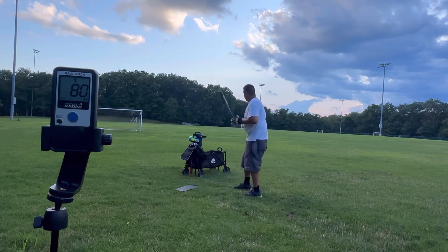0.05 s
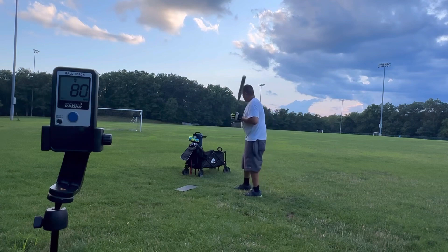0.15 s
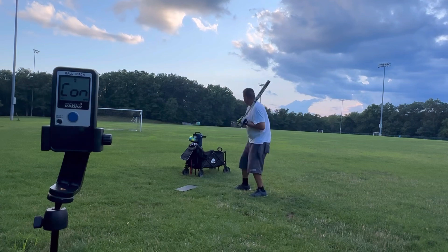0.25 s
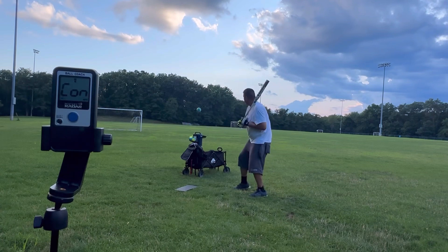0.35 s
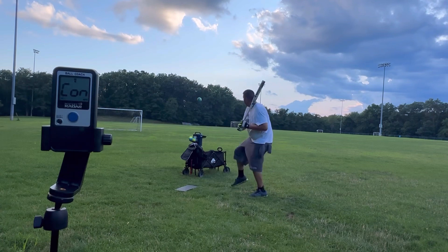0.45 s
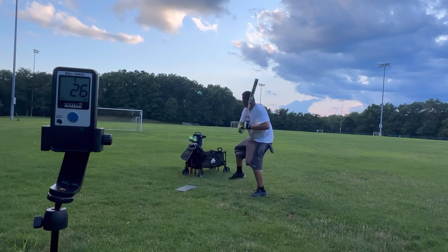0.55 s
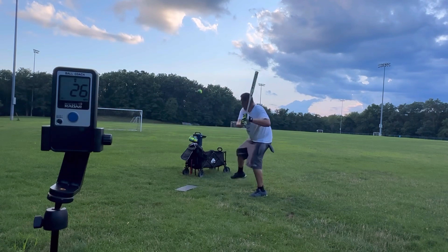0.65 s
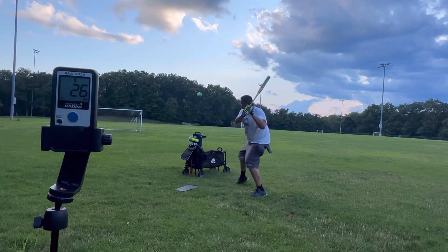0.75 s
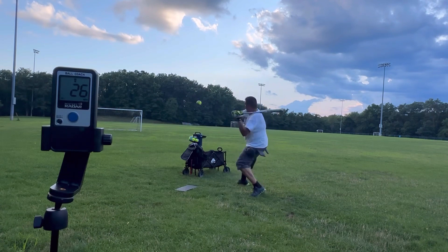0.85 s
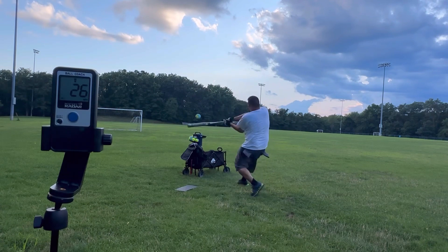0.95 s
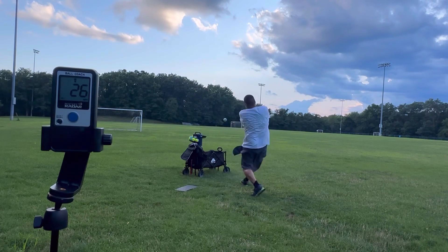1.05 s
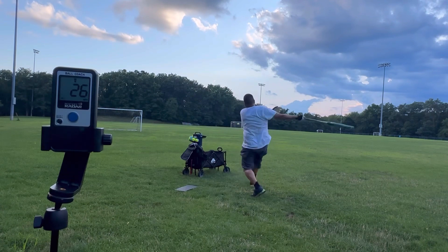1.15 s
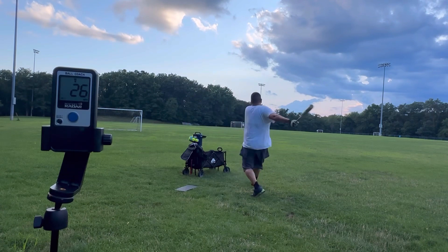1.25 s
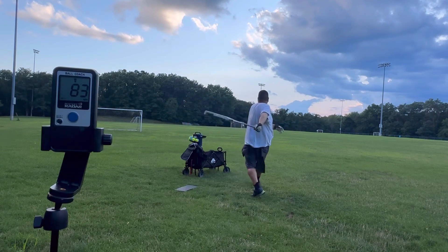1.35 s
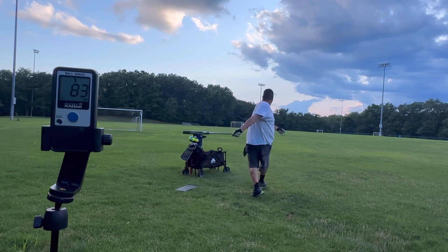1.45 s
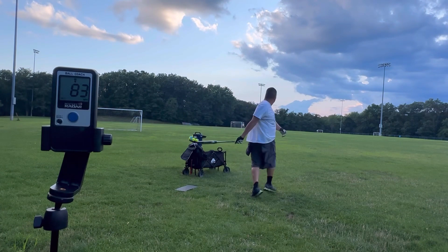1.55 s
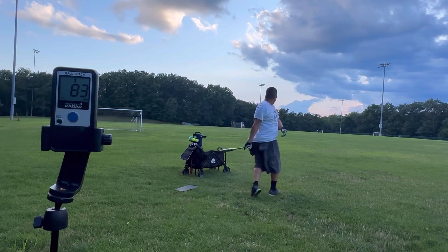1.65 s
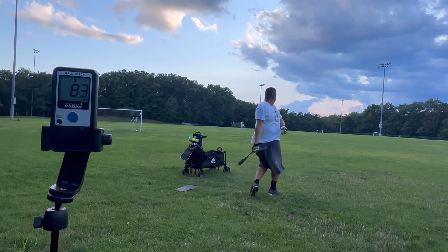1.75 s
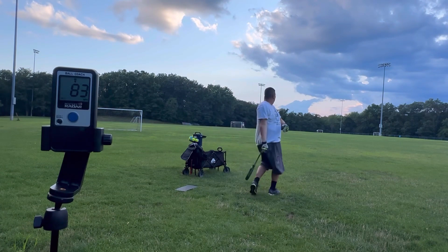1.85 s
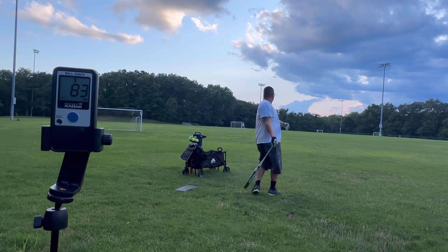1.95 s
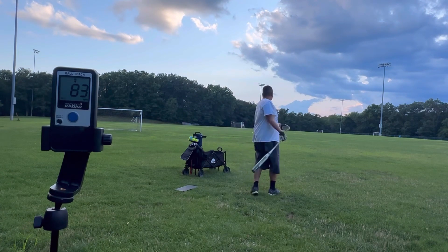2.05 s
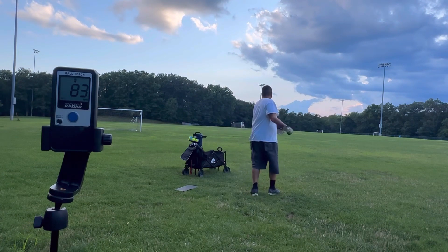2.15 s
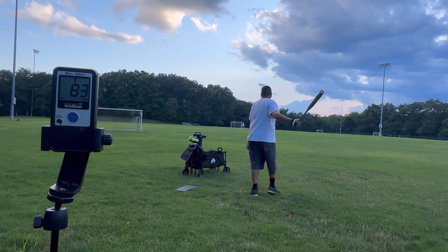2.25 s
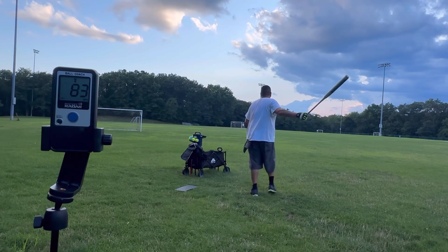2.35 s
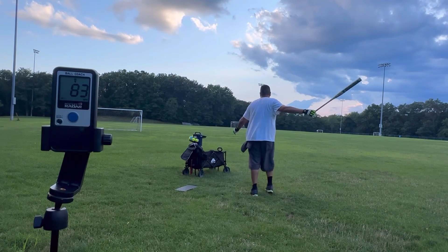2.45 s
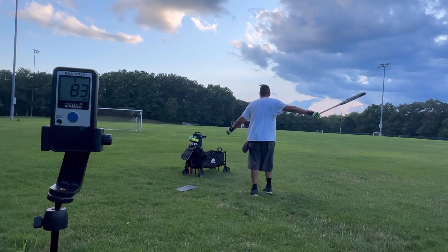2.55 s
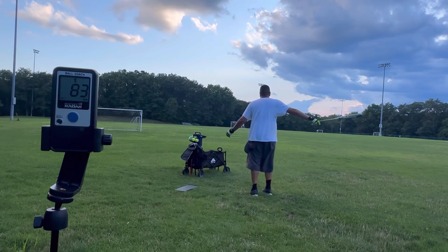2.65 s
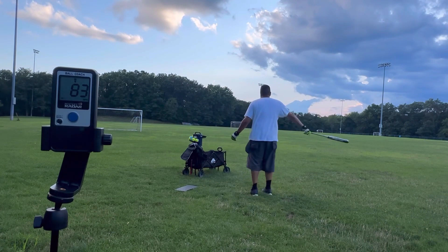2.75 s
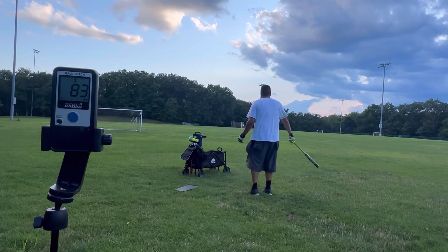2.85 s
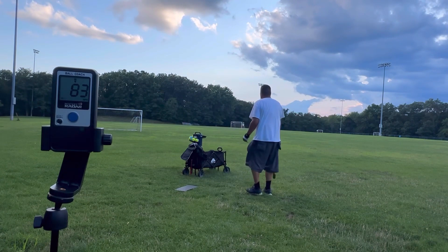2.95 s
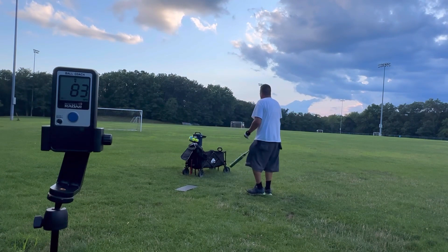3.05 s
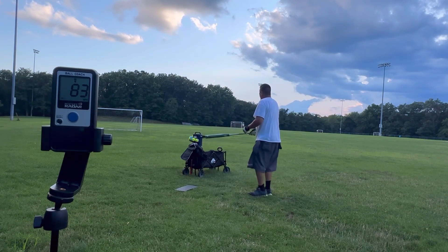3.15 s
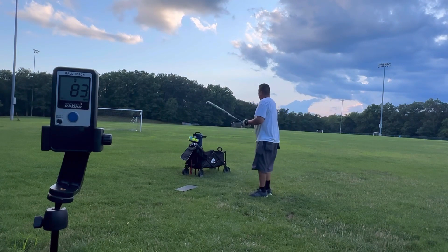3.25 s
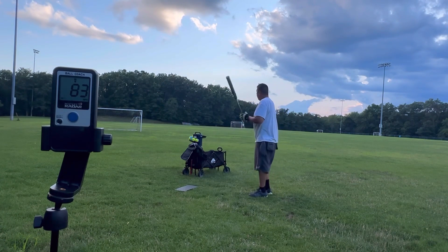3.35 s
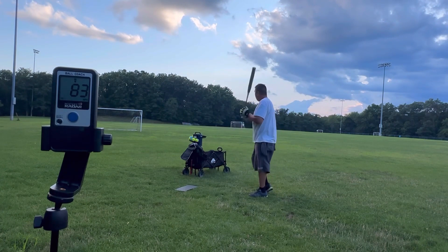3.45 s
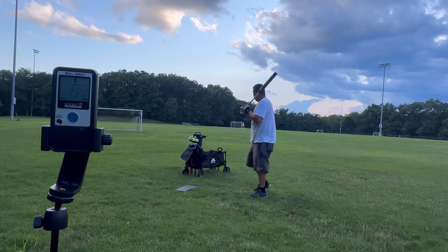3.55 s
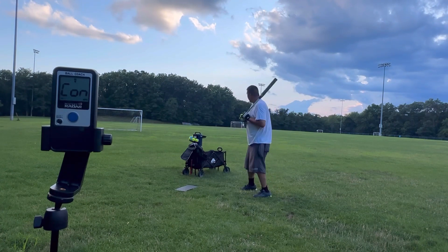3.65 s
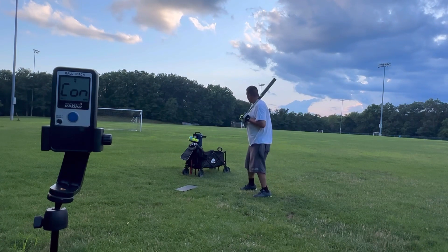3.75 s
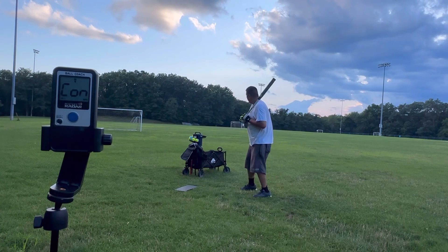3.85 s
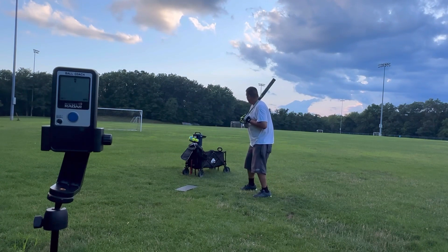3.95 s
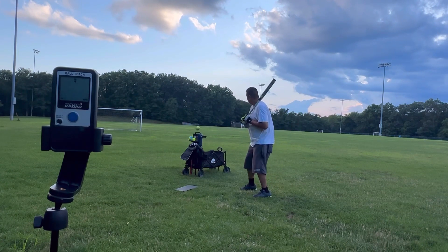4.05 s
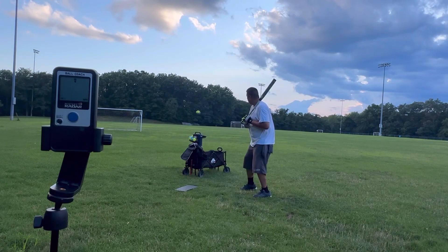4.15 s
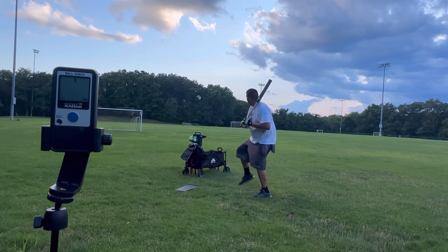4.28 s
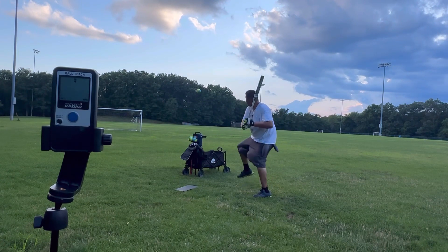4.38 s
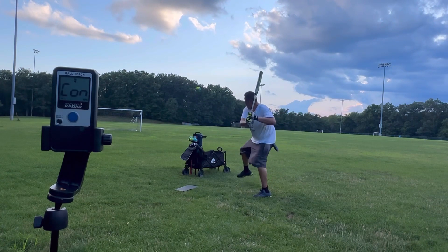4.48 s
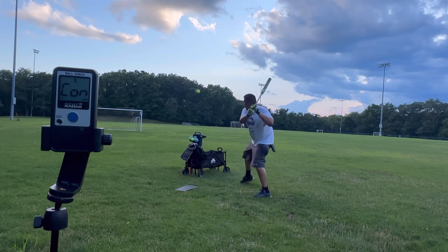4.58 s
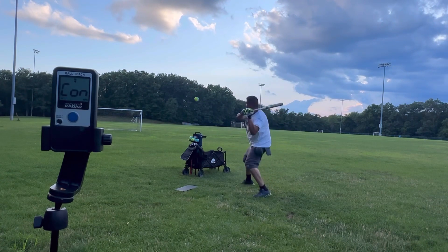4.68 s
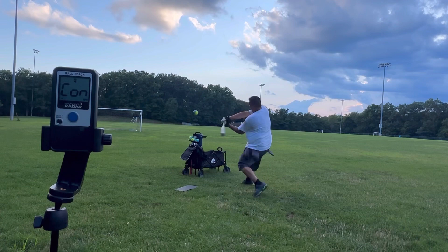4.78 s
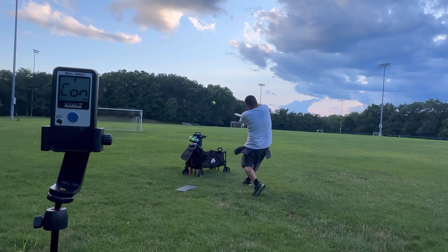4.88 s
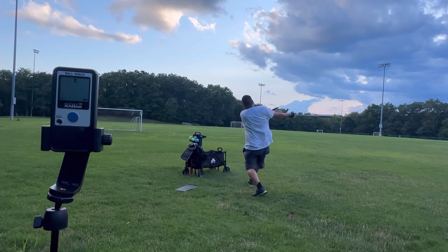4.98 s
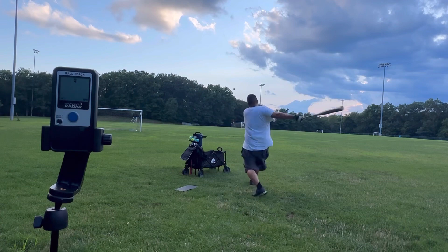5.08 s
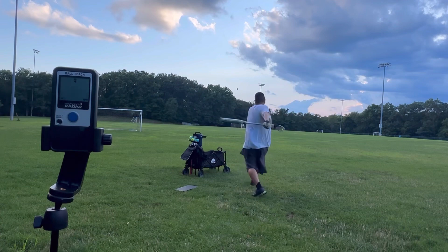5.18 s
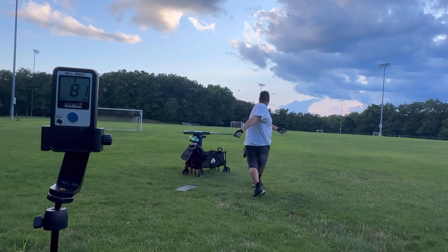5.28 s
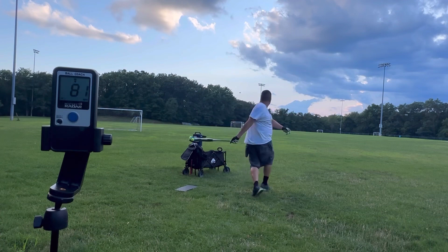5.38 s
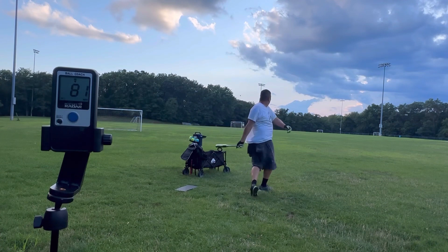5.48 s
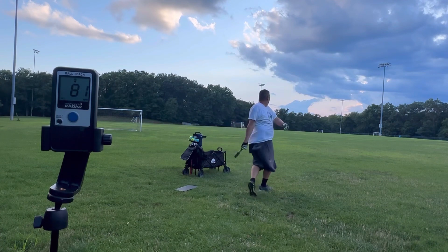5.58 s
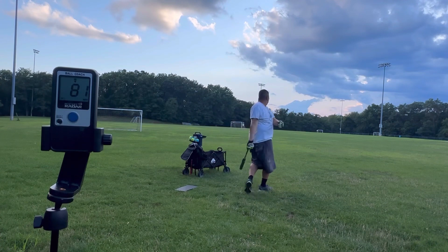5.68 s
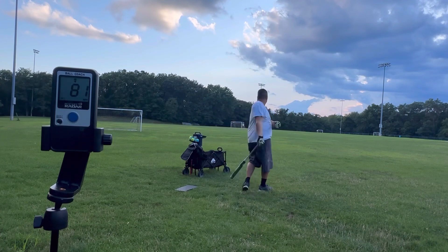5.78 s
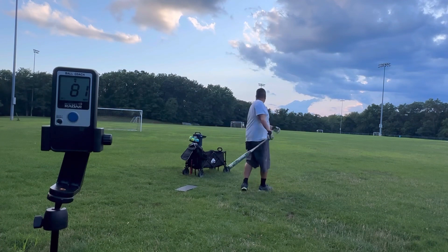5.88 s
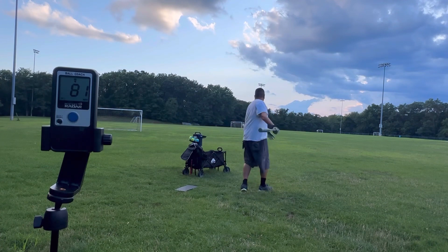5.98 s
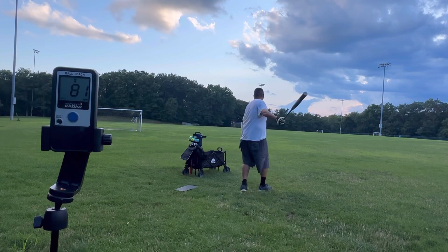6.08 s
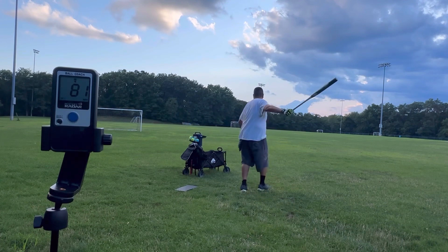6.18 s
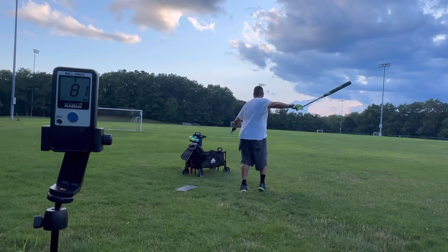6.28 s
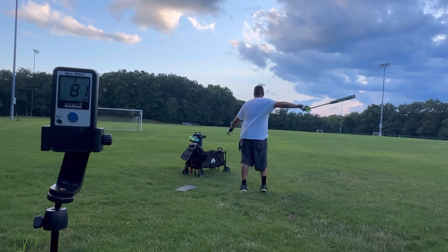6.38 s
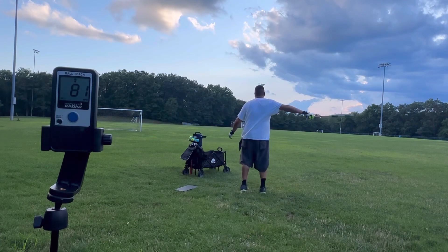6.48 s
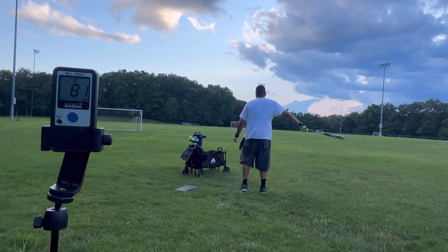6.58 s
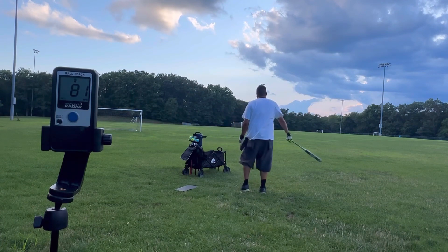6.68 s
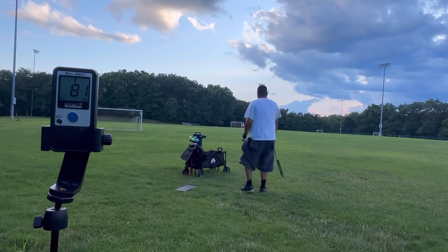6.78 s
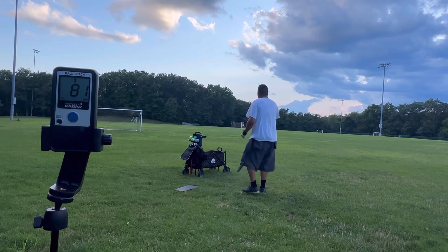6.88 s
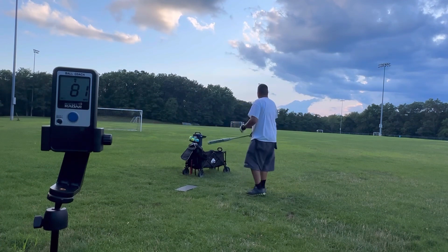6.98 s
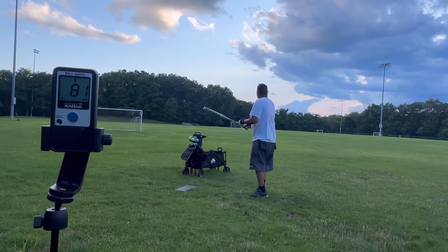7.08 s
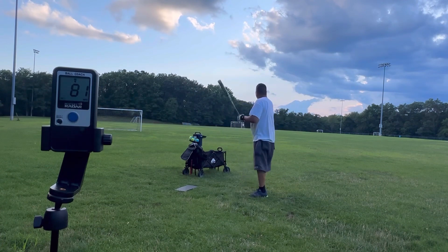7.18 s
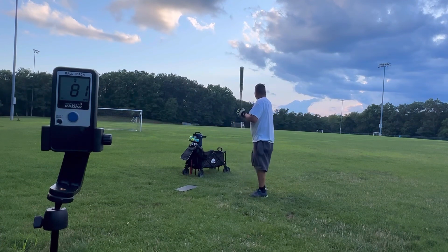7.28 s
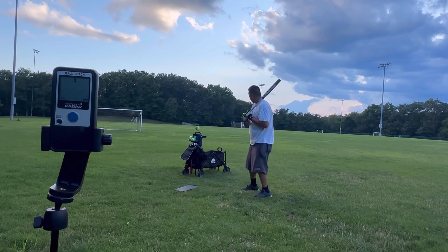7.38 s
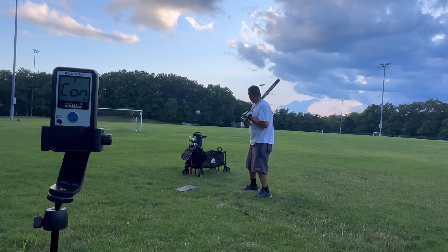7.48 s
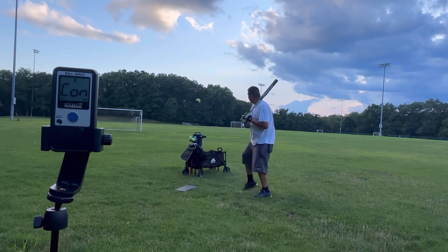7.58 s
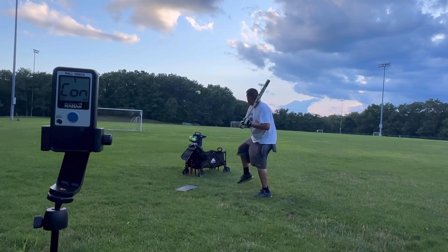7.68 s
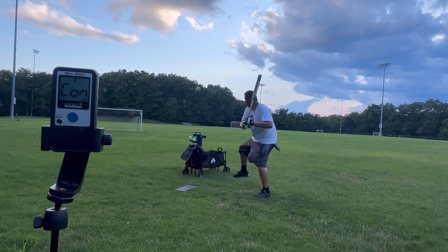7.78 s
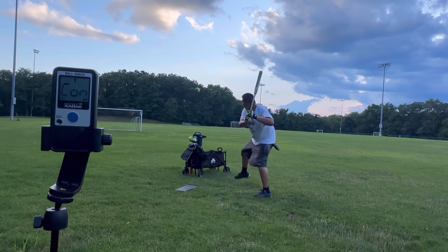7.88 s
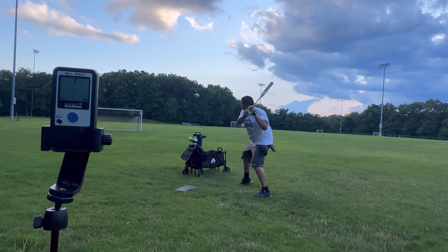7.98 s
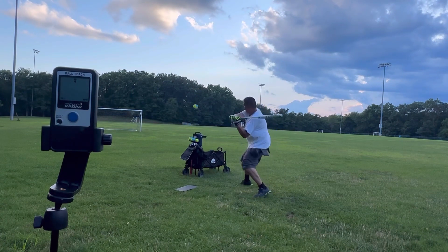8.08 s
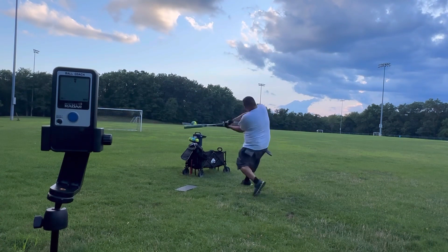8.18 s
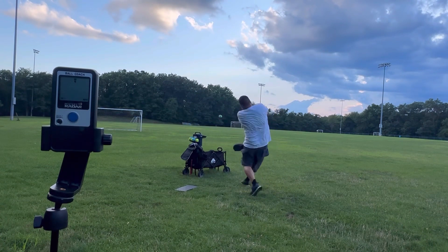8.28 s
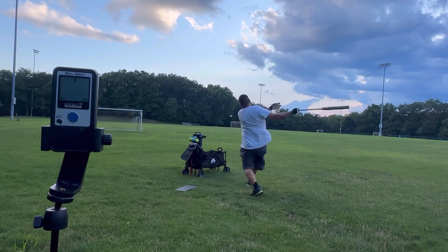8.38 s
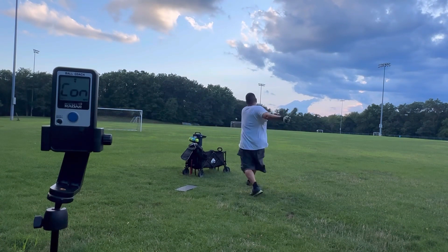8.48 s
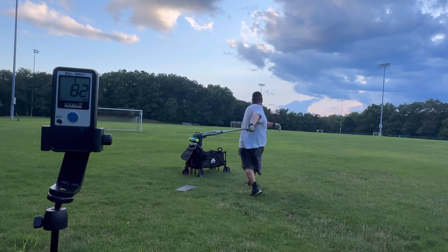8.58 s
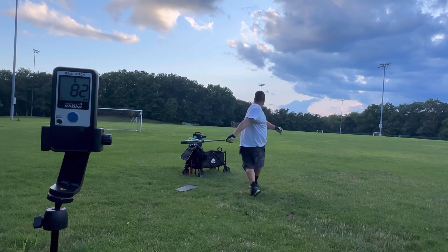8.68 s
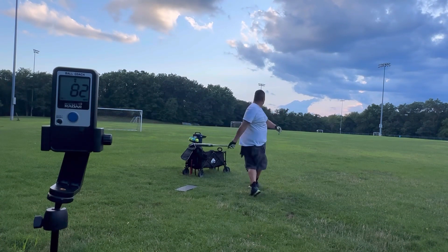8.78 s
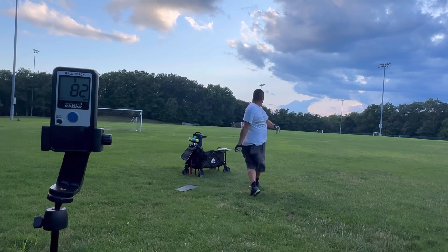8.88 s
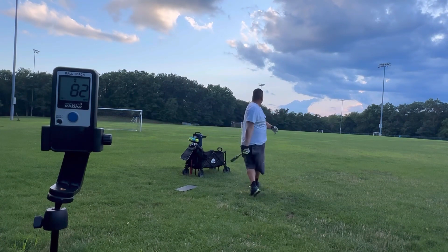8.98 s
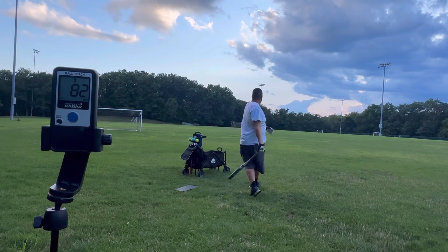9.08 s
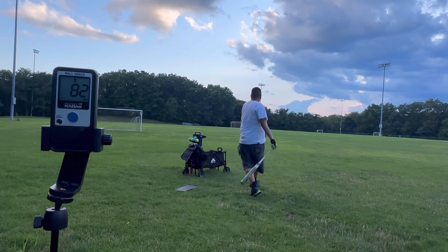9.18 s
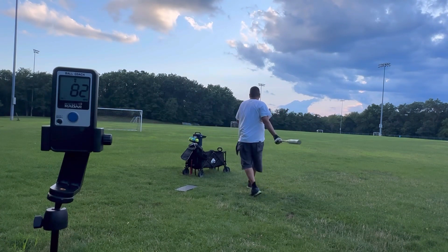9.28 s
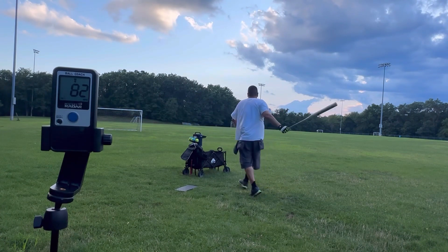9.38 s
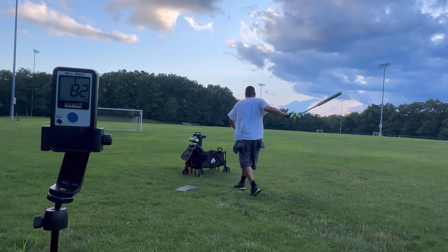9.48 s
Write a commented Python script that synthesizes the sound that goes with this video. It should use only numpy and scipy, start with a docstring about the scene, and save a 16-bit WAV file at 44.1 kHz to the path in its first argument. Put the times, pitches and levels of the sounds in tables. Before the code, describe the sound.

A quiet outdoor batting session heard in stereo from close behind the batter. Low traffic rumble and breeze lie underneath. Early grass scuffs and dull tube bumps lead to a loud, snappy bat crack; then two rounds of faint air hiss, hollow machine thump, rolling ball knocks, shuffling steps, and another crack. Trees and fences return brief, diffuse echoes, the last crack with a clearer flutter.

```python
"""Softball batting on a grass field

A feeder pops up balls with a hollow thump and the bat cracks: soft clicks ring tables of fading tones.
Things near and far throw these sounds back as delayed copies and clouds of fading noise.
Shaped noise makes distant traffic, motor, breeze, grass, cloth, hissing air, rasps and small knocks.
Balls bump the feeder's tube, and short wavering tones are bird chips."""
import sys
import numpy as np
from scipy import signal
from scipy.fft import rfft, irfft, next_fast_len
from scipy.io import wavfile

SR = 44100
rng = np.random.default_rng(int(sys.argv[2]) if len(sys.argv) > 2 else 0)


def persist_wave(psi):
    """Save psi, clipped to +-1, as 16-bit WAV."""
    counts = np.round(np.clip(psi, -1, 1) * 32767).astype(np.int16)
    wavfile.write(sys.argv[1], SR, np.atleast_2d(counts).T)


N = 420273  # length in samples

# bat on ball: t/s, level of the first 10 ms/dB, ground bounce delay/ms, then changes to the
# tones near 2 kHz/dB, near 4.5 kHz/dB, near 6.5 kHz/dB, above 8 kHz/dB, and fence flutter level/dB
CRACKS = [(0.9785, -14.5, 2.07, 2, 2.5, 5.5, 2.5, -55.5), (4.8369, -14, 2.07, 1, -1, -3, 6.5, -55),
          (8.2028, -14.5, 2.03, 4.5, 0.5, 3, 5.5, -31)]
# feeder throws a ball: t/s, level of the first 10 ms/dB, stroke length/ms
THROWS = [(3.9904, -26, 18), (7.3291, -25.5, 12.6)]
# ringing tones of the feeder's tube and frame: f/Hz, level/dB, time to fade by 60 dB/s
FEEDER_MODES = [(144.4, -7, 0.42), (167, -11, 0.09), (188, 1.5, 0.037), (237, 2.5, 0.17),
                (270.6, 6.5, 0.078), (305, -11, 0.13), (335, 5.5, 0.029), (390, -9, 0.057),
                (481, -4.5, 0.064), (633, -6, 0.023), (723, -4, 0.022), (859, 2, 0.012), (956, 0, 0.037),
                (1179, -13, 0.05), (1327, -15, 0.041), (1447, -12, 0.074), (2220, -10.5, 0.0086),
                (2680, -14, 0.02), (4100, -10.5, 0.0045), (7400, -22, 0.0029), (11200, -18.5, 0.003)]


def from_db(db):
    """Turn decibels into a gain."""
    return 10 ** (np.asarray(db) / 20)


def rms_one(x):
    """Scale a sound to an average strength (rms) of 1."""
    return x / np.sqrt(np.mean(x ** 2) + 1e-20)


def at_hz(points, hz):
    """Read a (Hz, value) table at any frequency, on a logarithmic frequency axis."""
    table = np.array(points)
    return np.interp(np.log(hz), np.log(table[:, 0]), table[:, 1])


def band(x, low_hz, high_hz):
    """Keep only the frequencies between two edges."""
    edges = [low_hz, min(high_hz, .45 * SR)]
    return signal.sosfilt(signal.butter(2, edges, "band", fs=SR, output="sos"), x)


def pan(x, db):
    """Make left louder than right by this many dB."""
    return x * from_db([[db / 2], [-db / 2]])


def drift(rate_hz):
    """Slow random wandering with a spread of 1, up to about the given rate."""
    pole = np.exp(-80 * np.pi * rate_hz / SR)
    noise = rng.standard_normal(N // 40 + 2002)  # one value every 40 samples
    slow = signal.lfilter([1], [1, -2 * pole, pole * pole], noise)[2000:]
    return np.interp(np.arange(N) / 40, np.arange(len(slow)), rms_one(slow))


def add(track, s, sound):
    """Mix a sound into a track at a time in seconds."""
    i = round(s * SR)
    track[..., i:i + sound.shape[-1]] += sound[..., :N - i]


def stereo_noise(mid, side, alike):
    """Mix two unrelated noises so that left and right are alike (1), unrelated (0) or opposite (-1)."""
    return np.sqrt(1 + alike) * mid + np.sqrt(1 - alike) * side * [[1], [-1]]


def spread(pair, hz):
    """Sound from all around reaches the two microphones alike or unlike, depending on frequency."""
    # likeness of left and right: f/Hz, likeness [limited to -1..1 below]
    likeness = [(60, 0.88), (110, 1.01), (200, 0.57), (380, 0.19), (700, -0.27), (1290, 0.066),
                (2380, 0.78), (4400, -0.21), (8120, 0.18), (15000, -2.2)]
    # balance of the sides: f/Hz, left minus right/dB
    lean = [(60, -0.5), (150, -0.5), (380, -2.5), (950, -2), (2380, 1.5), (5980, -1), (15000, 2.5)]
    alike = np.clip(at_hz(likeness, hz), -1, 1)
    return pan(stereo_noise(pair[0], pair[1], alike), at_hz(lean, hz))


def banded_noise(spectrum, patchy_db, flicker_hz):
    """Third-octave bands of stereo noise, each with its own level, flicker and likeness; rms 1."""
    edges = 22 * 2 ** np.arange(0, 9.7, 1 / 3)
    out, together = 0, drift(flicker_hz)
    white = rng.standard_normal((2, 2, N))  # neighbouring bands use different noise
    for k, (low, high) in enumerate(zip(edges, edges[1:])):
        hz = np.sqrt(low * high)
        if spectrum[0][0] < high and low < spectrum[-1][0]:
            flicker_db = patchy_db * (0.66 * together + drift(flicker_hz))
            gain = from_db(at_hz(spectrum, hz) + flicker_db)
            out = out + gain * spread(band(white[k % 2], low, high), hz)
    return rms_one(out)


def resonant_noise(peaks, waver_db):
    """Noise ringing in narrow resonances whose levels waver."""
    out = 0
    for hz, width_hz, db in peaks:
        r, w = np.exp(-np.pi * width_hz / SR), 2 * np.pi * hz / SR
        noise = rng.standard_normal((2, N))
        rung = signal.lfilter([1, 0, -1], [1, -2 * r * np.cos(w), r * r], noise)
        out = out + from_db(db + waver_db * drift(3.4)) * spread(rms_one(rung), hz)
    return out


def blow(modes, contacts):
    """A short series of soft clicks rings every tone of a body; rms 1 over the first 10 ms."""
    push = np.full(SR * 2 // 5, 1e-18)
    for ms, db, low_hz, high_hz in contacts:
        click = np.zeros(len(push))
        click[round(ms * SR / 1000)] = from_db(db + .7 * rng.normal())
        push += band(click, low_hz, high_hz)
    out = 0
    for k, (hz, db, t60) in enumerate(modes):
        r, w = from_db(-60 / (t60 * SR)), 2 * np.pi * hz / SR
        gain = from_db(db + .7 * rng.normal()) * (-1) ** k
        out = out + signal.lfilter([0, gain * np.sin(w)], [1, -2 * r * np.cos(w), r * r], push)
    return out / np.sqrt(np.mean(out[:SR // 100] ** 2))


def traffic():
    """Distant traffic and far leaves blend into a mostly low, gently flickering noise."""
    # f/Hz, level per Hz/dB
    far = [(15, -27), (30, -14), (55, 2.5), (100, 0), (183, -4.5), (300, -20), (450, -29), (650, -26.5),
           (1200, -34), (1900, -47.5), (3200, -48), (9300, -44), (10200, -63.5), (11500, -56.5),
           (13500, -65), (15000, -77)]
    return from_db(-47.5) * banded_noise(far, 0.93, 1.6)


def motor():
    """The feeder's motor housing colours noise with narrow, wavering resonances."""
    # f/Hz, width/Hz, level/dB
    housing = [(365.6, 7.9, -70), (737.4, 29, -70.5), (931, 40, -67.5), (1095, 18, -78.5), (1490, 120, -75),
               (2171, 142, -72), (2797, 29, -81.5), (3638, 89, -78), (3973, 52, -81.5), (4533, 295, -83),
               (8140, 130, -96)]
    return resonant_noise(housing, 1.9)


def slopes(t, s, rise_db_per_s, fall_db_per_s):
    """Power that climbs to 1 at time s and sinks again."""
    return from_db(2 * np.where(t < s, rise_db_per_s * (t - s), fall_db_per_s * (s - t)))


def movement():
    """Breeze, grass rustle and cloth swish, raised by gusts, the batter's moves and each swing."""
    # strength of the breeze: t/s, level/dB
    gusts = [(0, -48.5), (.2, -52), (.3, -44.5), (.55, -46), (.68, -49), (.79, -41), (1.25, -51),
             (1.7, -44.5), (2.15, -52.5), (2.95, -54), (3.12, -46), (3.35, -47), (3.6, -49), (3.93, -59),
             (4.2, -49), (4.45, -58), (5.2, -58.5), (6.2, -64.5), (7.2, -57), (7.52, -48.5), (7.85, -65),
             (8.6, -59.5), (9.53, -58)]
    # steps, turns and shifts: loudest at t/s, rise/s, fall/s, rustle level/dB, cloth level/dB
    moves = [(0.234, 0.0012, 0.075, -46.5, -51), (0.45, 0.57, 0.18, -54, -88),
             (1.481, 0.67, 0.67, -59, -69), (1.65, 0.39, 0.29, -55, -63), (1.966, 0.075, 0.022, -50, -58.5),
             (3.399, 0.075, 0.3, -68, -71), (3.721, 1, 0.16, -60, -61.5), (4.2, 0.076, 0.22, -57, -87),
             (4.41, 0.026, 0.45, -71, -67), (5.15, 0.23, 0.23, -61.5, -64.5),
             (5.43, 0.095, 0.14, -48, -57.5), (5.6, 0.12, 0.29, -60, -67), (5.82, 0.05, 0.029, -54, -62.5),
             (6.031, 0.1, 0.067, -63, -72), (7.25, 0.39, 0.25, -65, -62.5), (7.8, 0.079, 0.11, -60.5, -88),
             (8.069, 0.14, 0.03, -60, -64.5), (8.12, 0.046, 0.044, -62, -84),
             (8.58, 0.86, 0.53, -57.5, -66), (8.96, 0.3, 0.25, -57, -64.5), (9.2, 0.17, 0.41, -58.5, -89.5),
             (9.48, 0.099, 0.043, -65, -66)]
    # bat sweeping in, at contact: low whoosh level/dB, rustle level/dB, swish level/dB
    swing_db = (-43.5, -49, -56)
    # noise colours of breeze, grass and cloth, all: f/Hz, level per Hz/dB
    breeze_colour = [(35, -37), (60, 1), (233, -4.5), (304, -4), (370, -6.5), (606, -27.5), (700, -32.5),
                     (910, -58), (1540, -120)]
    rustle_colour = [(240, -35), (400, -4.5), (531, 1.5), (1420, -4), (2480, -13.5), (4080, -29),
                     (4320, -28.5), (6000, -30), (7800, -59.5), (13200, -120)]
    cloth_colour = [(2500, 4.5), (3600, 7), (5500, 2.5), (7500, 1), (9300, -6.5), (10200, -5.5),
                    (11500, -15.5), (13500, -18), (15000, -44)]
    still_rustle_db, still_cloth_db = -73, -77
    edge_db = 16  # how far a move has faded at the end of its rise and fall
    t = np.arange(0, N / SR, .001)
    breeze_power = from_db(2 * np.interp(t, *np.transpose(gusts)))
    rustle_power, cloth_power = from_db(2 * still_rustle_db), from_db(2 * still_cloth_db)
    for s, rise_s, fall_s, rustle_db, cloth_db in moves:
        shape = slopes(t, s, edge_db / rise_s, edge_db / fall_s)
        rustle_power = rustle_power + from_db(2 * rustle_db) * shape
        cloth_power = cloth_power + from_db(2 * cloth_db) * shape
    swing = sum(slopes(t, s, 148, 600) for s, *_ in CRACKS)  # rise and fall in dB per second
    levels = []
    for power, db in zip((breeze_power, rustle_power, cloth_power), swing_db):
        level = np.sqrt(power + from_db(2 * db) * swing)
        levels.append(np.interp(np.arange(N) / SR, t, level))
    breeze, rustle, cloth = levels
    grains = from_db(3.5 * drift(130.0))  # grass crunches in grains
    grass = rms_one(grains * banded_noise(rustle_colour, 2.6, 25.0))
    air = banded_noise(breeze_colour, 3.3, 8.6)
    return breeze * air + cloth * banded_noise(cloth_colour, 1.2, 19.0) + rustle * grass


def knocks():
    """Balls, feet and bat knock the ground: a fast-dying scuff of noise over a low thud."""
    # t/s, dull scuff peak/dB, thud peak/dB, bright scuff peak/dB [peaks before panning], pan/dB
    table = [(0.232, -36.5, -35, -42, -6), (0.322, -44, -45, -62, 3), (0.398, -49, -60, -70, 2),
             (0.416, -44, -60, -66, 4), (0.45, -53, -60, -66, 0), (0.771, -46, -51, -70, -1),
             (0.878, -46, -58, -48, -4), (1.509, -42, -38, -68, -5), (1.748, -66, -43, -75, -8),
             (1.964, -43, -46, -61.5, -6), (3.648, -48, -46, -49, 4), (4.183, -46, -57, -75.5, 6),
             (4.208, -45, -61, -60, 1), (4.222, -46, -50, -70, 1.5), (4.399, -47, -62, -72, -0.5),
             (4.723, -47, -44, -72.5, -3), (5.342, -48, -63, -67, -6.5), (5.38, -47, -62, -46, 2.5),
             (5.41, -43, -56, -62, 0), (5.421, -41, -61, -62, -1.5), (5.579, -47, -53.5, -61, -3),
             (5.821, -42.5, -62, -52, -6.5), (6.015, -53, -55, -72.5, -6), (7.818, -47, -65, -80, 0),
             (8.11, -54, -42, -67, -1), (8.952, -42, -35.5, -46, -1)]
    out, t = np.zeros((2, N)), np.arange(SR // 8) / SR
    for s, db, thud_db, bright_db, pan_db in table:
        scuff, thud = rng.standard_normal((2, len(t)))
        scuff[0], thud[0] = 14, 25  # the first touch is a click
        scuff = scuff * np.exp(-t / 0.0065)
        dull = band(band(scuff, 560, 2470), 330, 3500)
        bright = band(band(scuff, 2500, 13000), 2000, 15000)
        thud = band(band(thud * np.exp(-t / 0.0018), 107, 330), 99, 740)
        layers = [(db, dull), (bright_db, bright), (thud_db, thud)]
        knock = sum(from_db(level) * x / np.abs(x).max() for level, x in layers)
        add(out, s, pan(knock, pan_db))
    return out


def bumps():
    """Balls roll down and softly bump the feeder's tube, waking mainly its low tones."""
    # t/s, level of the first 10 ms before the extra fade/dB
    table = [(0.235, -45), (0.27, -42.5), (0.32, -44), (0.357, -38), (0.382, -36), (0.428, -36),
             (0.447, -36.5), (0.491, -50), (0.538, -42), (4.186, -39), (4.226, -39), (4.267, -44),
             (4.303, -40), (7.535, -42), (7.569, -46), (7.657, -53)]
    out = np.zeros(N)
    fade = from_db(-60 * np.arange(SR * 2 // 5) / SR / 0.057)  # the resting ball damps the ring
    for s, db in table:
        add(out, s, from_db(db) * fade * blow(FEEDER_MODES, [(0, 0, 150, 227)]))
    return out


def birds():
    """Short near-sine chips whose pitch wavers slightly, with a blur of echoes from the trees."""
    # t/s, level/dB, middle f/Hz, length/ms
    chips = [(0.492, -67, 4000, 34), (0.579, -70, 4230, 31), (1.468, -56, 4020, 43), (1.519, -63, 3870, 25),
             (2.55, -77, 4200, 37), (2.62, -75.5, 4200, 90), (2.872, -73.5, 4640, 30),
             (2.95, -77, 4640, 50), (3.465, -70, 4320, 50), (4.062, -62, 4070, 56), (4.11, -69, 4050, 35),
             (4.143, -69, 4050, 60), (4.205, -69, 4040, 44), (4.347, -59, 4130, 41), (5.959, -68, 4520, 44),
             (6.049, -74, 4560, 60), (7.152, -70, 4560, 35), (7.21, -73, 4560, 36), (7.265, -73, 4800, 40),
             (7.865, -72, 4250, 35), (7.897, -71.5, 4260, 33), (7.906, -70.5, 4550, 30),
             (7.94, -70, 4260, 30), (8.573, -61.5, 4020, 57), (8.615, -63, 4020, 40)]
    out = np.zeros(N)
    for s, db, hz, ms in chips:
        part = np.linspace(0, 1, round(ms * SR / 1000))  # 0 at the start, 1 at the end
        waver = 1.004 - 0.0066 * part + 0.0052 * np.sin(rng.uniform(0, 7) + 9 * part)
        tone = np.sin(2 * np.pi * np.cumsum(hz * waver) / SR)
        tremble = 1 + 0.34 * np.sin(rng.uniform(0, 6.08) + 2 * np.pi * 70 * part * ms / 1000)
        tone = tone * from_db(2.5 * drift(40.0)[:len(part)]) * tremble
        add(out, s, from_db(db) * tone * np.sin(np.pi * part ** .5))
    t = np.arange(SR // 4) / SR
    trees = rng.standard_normal((2, len(t))) * from_db(-36 - 60 * t / 0.4)
    return pan(out, -4) + signal.oaconvolve(out[None], trees, axes=1)[:, :N]


def rasps():
    """Short hollow rasps as the swing starts: a puff of noise in one broad resonance."""
    # t/s, peak before panning/dB, f/Hz, length/ms
    table = [(0.771, -51, 850, 16), (0.874, -44, 910, 16), (0.908, -52, 900, 12), (4.723, -48, 870, 24),
             (8.098, -45.5, 815, 57), (8.172, -45, 820, 33)]
    out = np.zeros((2, N))
    for s, db, hz, ms in table:
        part = np.linspace(0, 1, round(ms * SR / 1000))
        puff = rng.standard_normal(len(part)) * np.sqrt(part) * (1 - part)
        puff = np.r_[puff, np.zeros(SR // 100)]  # room for the filters to ring out
        puff = band(band(puff, hz / 1.35, hz * 1.23), hz / 1.32, hz * 1.76)
        add(out, s, pan(from_db(db) * puff / np.abs(puff).max(), -2.5))
    return out


def bat():
    """Ball against barrel rings the bat, then a low wave trails along the ground, falling in pitch."""
    # barrel and ball tones: f/Hz, level/dB, time to fade by 60 dB/s
    bat_modes = [(650, -0.5, 0.0095), (816, -11, 0.0079), (1046, -1, 0.0071), (1445, -0.5, 0.0087),
                 (1840, -8, 0.0082), (1886, 4, 0.0049), (2100, -7.5, 0.0042), (2176, -9, 0.0013),
                 (2600, -13, 0.0064), (2674, -4.5, 0.01), (3223, -15, 0.004), (4078, -12.5, 0.008),
                 (5160, -11.5, 0.0069), (5760, -18.5, 0.0068), (6400, -7.5, 0.005), (7000, -9.5, 0.0043),
                 (8160, -12.5, 0.01), (9050, -9.5, 0.012), (10570, -12, 0.008), (11600, -7.5, 0.0026),
                 (13600, -6.5, 0.0038), (13920, -17.5, 0.0046), (15700, -23, .003)]
    # touch, full squeeze, ground bounce: delay/ms [bounce adds the hit's own], level/dB, low f/Hz, high f/Hz
    contact = [(0.046, -2.5, 1100, 19000), (0.851, 8, 370, 9900), (0.056, 6.5, 264, 4300)]
    # where along the barrel the ball is met decides how strongly each group wakes: group edges f/Hz
    group_edges = (1600, 2900, 3600, 5500, 7700)
    # low wave: level against the crack/dB, start f/Hz, end f/Hz, fall time/ms, time to fade by 60 dB/s
    ground_db, start_hz, end_hz, fall_ms, t60 = (-16.5, 372, 79, 9, 0.15)
    out, t = np.zeros(N), np.arange(SR // 5) / SR
    hz = end_hz + (start_hz - end_hz) * np.exp(-1000 * t / fall_ms)
    wave = from_db(ground_db - 60 * t / t60) * np.sin(2 * np.pi * np.cumsum(hz) / SR)
    *squeeze, (ms, *bounce) = contact
    for s, db, bounce_ms, upper_db, ping_db, snap_db, tick_db, _ in CRACKS:
        groups = [0, upper_db, 0, ping_db, snap_db, tick_db]
        modes = [(f, g + groups[np.searchsorted(group_edges, f)], ring) for f, g, ring in bat_modes]
        add(out, s, from_db(db) * blow(modes, [*squeeze, (ms + bounce_ms, *bounce)]))
        add(out, s + 0.0019, from_db(db) * wave)
    return out


def direct(x):
    """The body between the microphones tilts level and phase between left and right."""
    # a source in front: f/Hz, left minus right/dB
    front_lean = [(200, -1.5), (380, -2.5), (700, 2), (1290, 4), (2380, 8), (4400, 7), (8120, 0.5),
                  (15000, 1.3)]
    # a source in front: f/Hz, phase by which left leads/rad
    front_lead = [(100, 0.5), (300, -0.25), (700, 0.25), (1500, .65), (1900, 0.96), (3000, -0.5), (4300, 1),
                  (5900, 3.5), (8300, 7), (12500, 12.5), (16000, 15.5)]
    size = next_fast_len(N)
    hz = np.fft.rfftfreq(size, 1 / SR) + 1
    half = from_db(at_hz(front_lean, hz) / 2) * np.exp(.5j * at_hz(front_lead, hz))
    return irfft(rfft(x, size) * [half, 1 / half], size)[:, :N]


def scattering():
    """Clouds of scattered sound: one random response for each microphone."""
    # start/ms, rise/ms, time to fade by 60 dB/s, left level/dB, right level/dB, low f/Hz, high f/Hz,
    # left-right likeness
    clouds = [(3.895, 1.2, 0.054, 6, 7.5, 230, 15000, 0.71), (22, 6.5, 0.4, 1.5, -0.5, 120, 950, -0.6),
              (20.2, 4.6, 0.37, 0, 0.5, 950, 3000, -.1), (17.1, 6.2, 0.27, 8, 10, 3300, 31000, 0.027),
              (128, 17, 0.18, -13.5, -12.5, 400, 8200, -.2), (260, 166, 1, -20, -16.5, 760, 1780, -0.19),
              (255, 23, 0.79, -30, -22.5, 1800, 7600, -0.12)]
    t = np.arange(SR * 3 // 2) / SR
    clumps = [from_db(3.6 * drift(110.0)[:len(t)]) for _ in range(2)]  # reflectors stand in groups
    response = 0
    for k, (ms, rise_ms, t60, left_db, right_db, low_hz, high_hz, alike) in enumerate(clouds):
        age = np.maximum(t - ms / 1000, 0)
        shape = (1 - np.exp(-1000 * age / rise_ms)) ** 2 * from_db(-60 * age / t60)
        mid, side = rng.standard_normal((2, len(t)))
        pair = stereo_noise(mid, side, alike) / np.sqrt(2)
        cloud = band(pair, low_hz, high_hz) * clumps[k % 2] * shape / shape.max()
        response = response + from_db([[left_db], [right_db]]) * cloud
    return response


def scattered(events, colour, level_db):
    """Each blow is followed by a freshly drawn cloud of fading noise in the colour of its source."""
    out = np.zeros((2, N))
    for s, db, *_ in events:
        response = scattering()
        size = response.shape[1]
        hz = np.fft.rfftfreq(size, 1 / SR) + 1
        coloured = irfft(rfft(response) * from_db(at_hz(colour, hz)), size)
        add(out, s, from_db(db + level_db) * coloured)
    return out


def echoes(x, table, low_hz, high_hz):
    """Delayed copies of a sound, kept to one band of frequencies."""
    out = np.zeros((2, N))
    for ms, left_db, right_db in table:
        add(out, ms / 1000, from_db([[left_db], [right_db]]) * x)
    return band(out, low_hz, high_hz)


def close_echoes(x):
    """Flat things close by return the blow as clear echoes."""
    # delay/ms, left level/dB, right level/dB
    table = [(31, -28.5, -24.5), (34.2, -25, -9), (41, -18, -34), (53.8, -37, -12.5), (45, -34, -18),
             (59, -32, -22), (67.7, -41, -26), (70.8, -39, -35), (76, -36, -34), (92.5, -40, -42),
             (109, -43, -46), (130, -36, -42), (140, -38, -42), (149, -37, -40), (152, -39, -44),
             (160.9, -43, -40)]
    return echoes(x, table, 1240, 2400)


def slaps(x):
    """Dull echoes from the sides, which the two microphones hear in opposite phase."""
    # delay/ms, left level/dB, right level/dB
    table = [(41, -12.5, -17), (45.4, -18, -16), (54.3, -11, -10.5), (57.5, -26, -18.5), (69.5, -26, -30),
             (77.5, -39, -38), (83.5, -33, -31), (90.5, -28, -27), (100, -26.5, -31), (113.5, -33, -28),
             (132.5, -23, -27), (163, -48, -24.5), (180, -35, -32), (205, -34, -34)]
    left, right = echoes(x, table, 420, 980)
    lag_s = .0001  # left hears them this much later
    return np.array([np.roll(left, round(lag_s * SR)), -right])


def flutter(crack):
    """A row of fence posts answers each crack one after another: five evenly spaced returns."""
    first_ms, step_ms, loss_db = 164.5, 6.2, 1  # each post answers later and weaker
    s, *_, db = np.transpose(CRACKS)
    latest = np.searchsorted(s[1:] * SR, np.arange(N))  # which crack each sample belongs to
    heard = crack * from_db(db)[latest]
    posts = [(first_ms + step_ms * k, -loss_db * k - 11.0, -loss_db * k) for k in range(5)]
    return echoes(heard, posts, 870, 6300)


def filling():
    """Air hisses into the feeder before a throw, fading in and out through wavering resonances."""
    # start/s, end/s, level/dB
    fills = [(3.26, 3.84, -66), (7.02, 7.302, -69.5)]
    # resonances of the hiss: f/Hz, width/Hz, level/dB
    peaks = [(4550, 300, -30), (6540, 230, -19), (7130, 130, -14.5), (8100, 260, -13), (11500, 1500, -39),
             (13300, 700, -28)]
    fade_db_per_s = 150.5
    t, level = np.arange(N) / SR, 0
    for start, end, db in fills:
        outside_s = np.maximum(np.maximum(start - t, t - end), 0)
        level = level + from_db(db - fade_db_per_s * outside_s)
    return level * resonant_noise(peaks, 1.5)


def feeder():
    """The piston's clicks ring the tube as a thump, and air bursts out as a fading puff of noise."""
    # piston release, rattle up the tube, ball launch, end stop:
    # share of the stroke [0 to 1], level/dB, low f/Hz, high f/Hz
    stroke = [(0, 12, 1010, 14000), (0.133, 5, 596, 2940), (0.23, 6.5, 590, 2980), (0.422, 10, 71.4, 1500),
              (.7, 2, 500, 3000), (0.974, 2.5, 506, 3900)]
    puff_db, puff_t60 = -7.5, 0.16  # starting level against the thump; seconds to fade by 60 dB
    out, t = np.zeros(N), np.arange(SR // 5) / SR
    for s, db, ms in THROWS:
        contacts = [(share * ms, *rest) for share, *rest in stroke]
        add(out, s, from_db(db) * blow(FEEDER_MODES, contacts))
        air = rng.standard_normal(len(t)) * from_db(7.0 * drift(140.0)[:len(t)])  # it sputters
        bright = band(band(air, 1500, 7500), 900, 10300)
        air = rms_one(band(air, 420, 2230) + from_db(-19.0) * bright)
        add(out, s, from_db(db + puff_db - 60 * t / puff_t60) * air)
    return out


def scene():
    """All sources on the field, with the blows and what is thrown back."""
    # tone of the scattered crack and thump, both: f/Hz, level/dB
    crack_colour = [(180, -44.5), (300, -7.5), (600, -4), (1030, -10), (1300, -5), (4490, -17.5),
                    (8280, -19.5), (9930, -23), (10400, -37), (13600, -32.5), (15500, -77.5)]
    thump_colour = [(180, -39), (300, 4), (808, -12), (985, -3), (1350, -9.5), (1540, -9), (5000, -26.5),
                    (9290, -34.5), (13600, -42.5), (14500, -89)]
    background = traffic() + motor() + movement()
    small_sounds = knocks() + birds() + rasps()
    crack, thump = bat(), feeder() + bumps()
    hits = direct(crack + thump)
    hits += scattered(CRACKS, crack_colour, -5.5) + scattered(THROWS, thump_colour, -1.6)
    hits += close_echoes(crack + from_db(-9.5) * thump)
    hits += slaps(crack + from_db(-10.0) * thump) + flutter(crack)
    return background + small_sounds + hits + filling()


def record(dry):
    """The lowest bass is cut, peaks are rounded, the top is cut."""
    dry = signal.sosfilt(signal.butter(2, 38, "high", fs=SR, output="sos"), dry)
    dry = dry / (1 + np.abs(dry / .88) ** 4) ** .25
    # 90 dB down from 16.7 kHz upwards
    return signal.sosfilt(signal.cheby2(14, 90, 16700, fs=SR, output="sos"), dry)


dry = scene()
out = record(dry)
persist_wave(out)
```